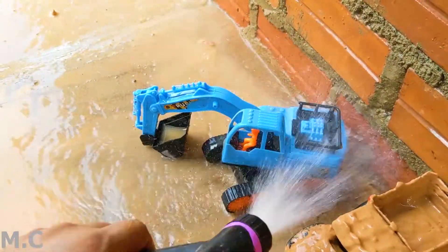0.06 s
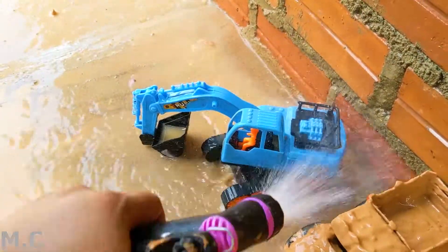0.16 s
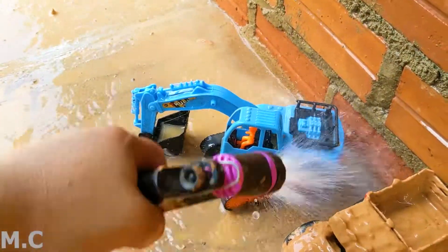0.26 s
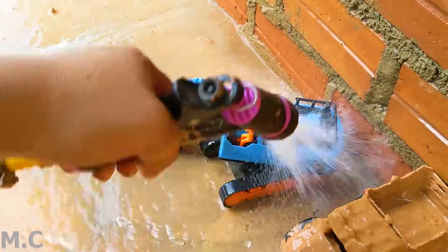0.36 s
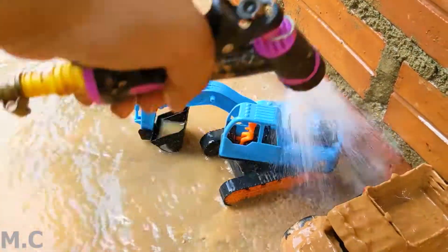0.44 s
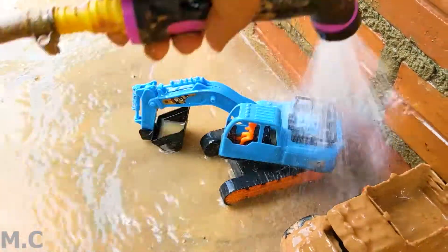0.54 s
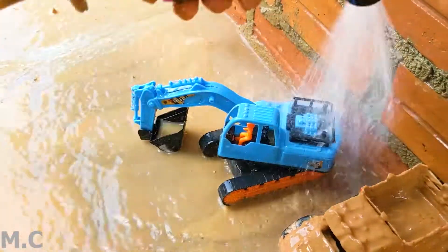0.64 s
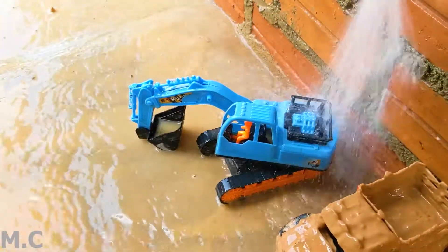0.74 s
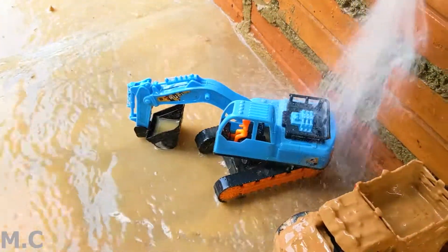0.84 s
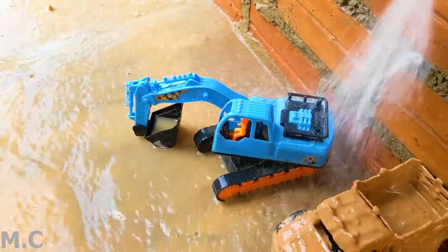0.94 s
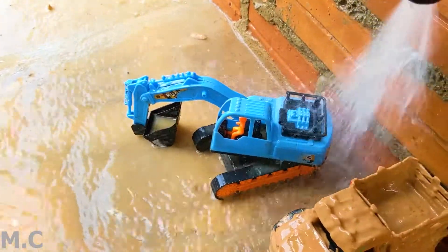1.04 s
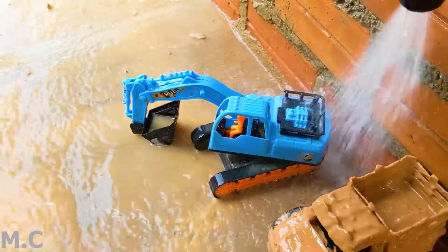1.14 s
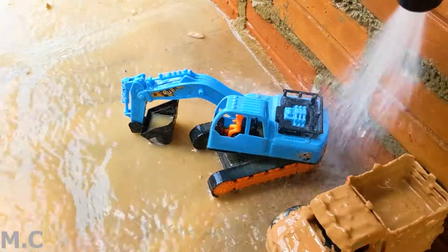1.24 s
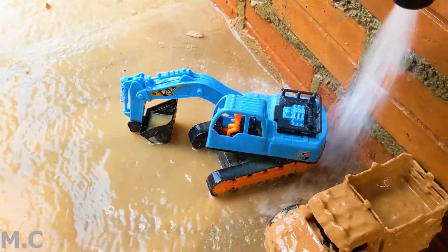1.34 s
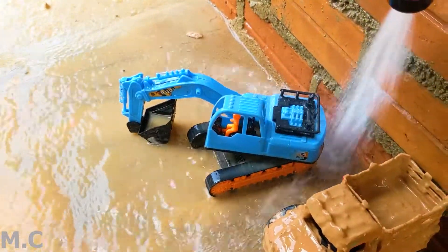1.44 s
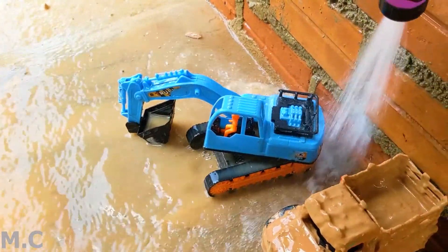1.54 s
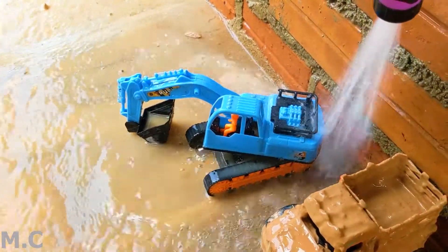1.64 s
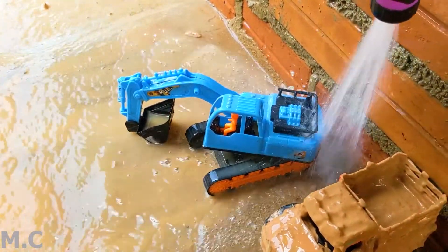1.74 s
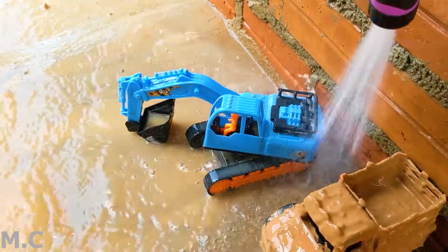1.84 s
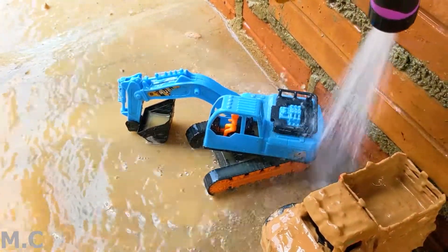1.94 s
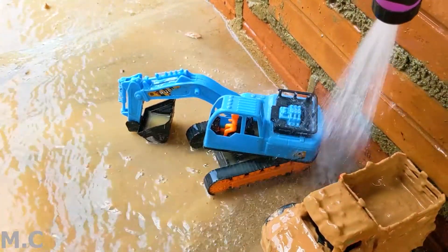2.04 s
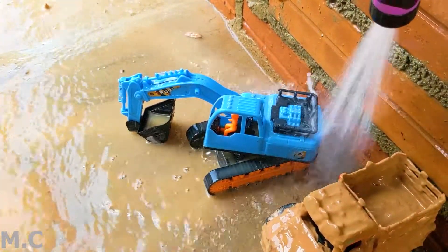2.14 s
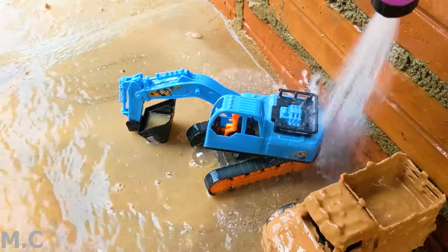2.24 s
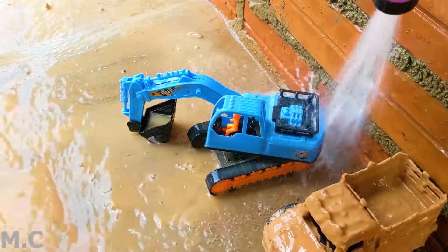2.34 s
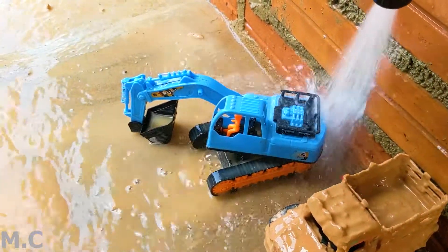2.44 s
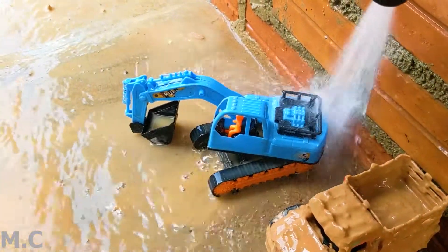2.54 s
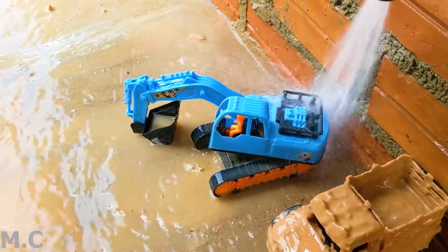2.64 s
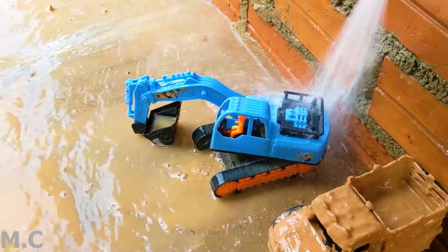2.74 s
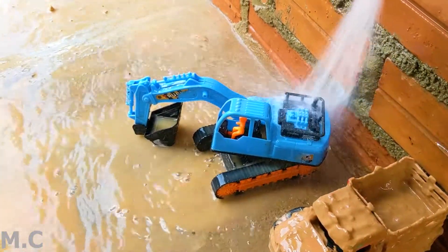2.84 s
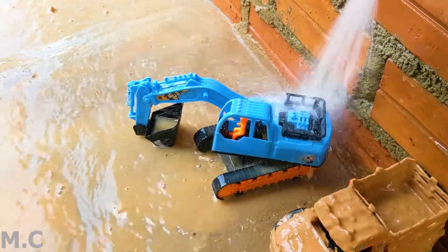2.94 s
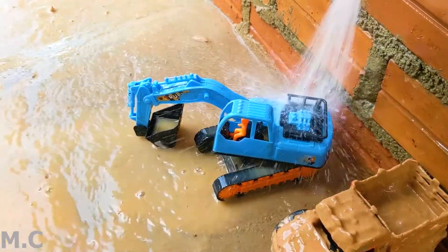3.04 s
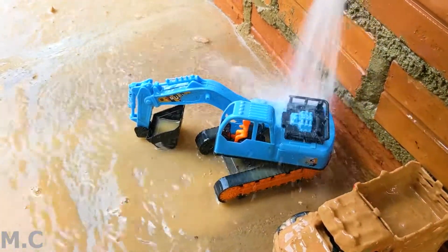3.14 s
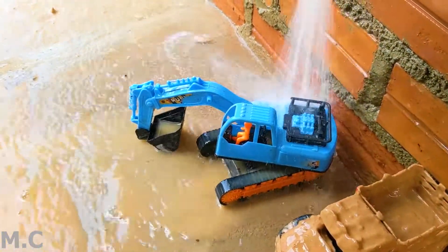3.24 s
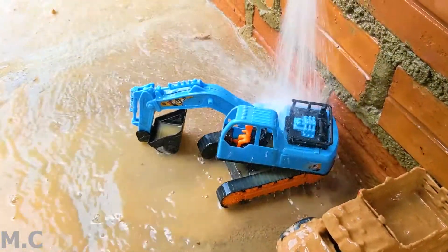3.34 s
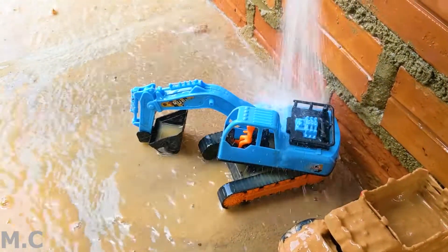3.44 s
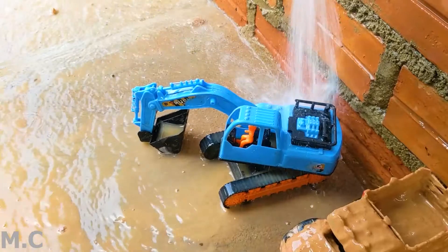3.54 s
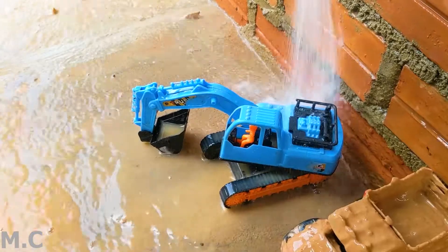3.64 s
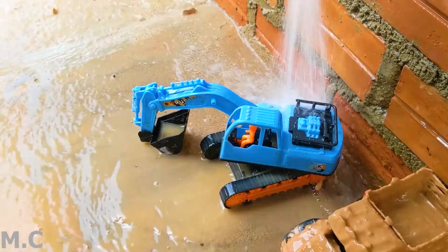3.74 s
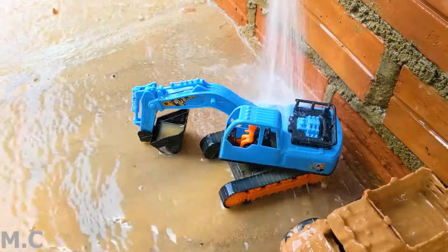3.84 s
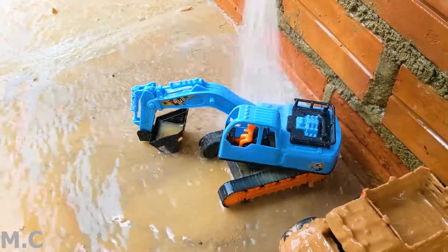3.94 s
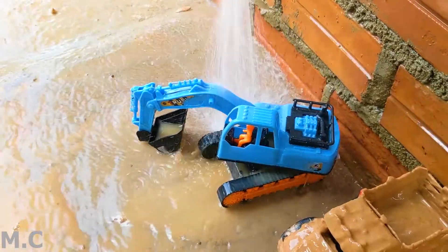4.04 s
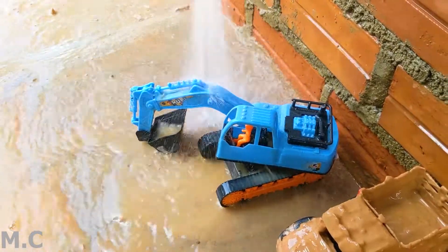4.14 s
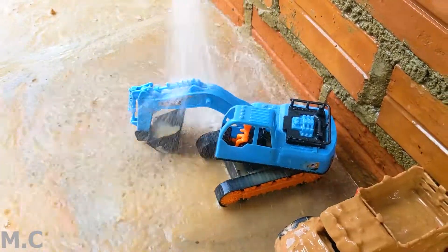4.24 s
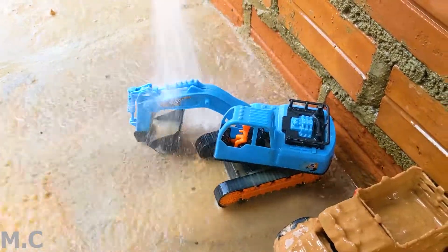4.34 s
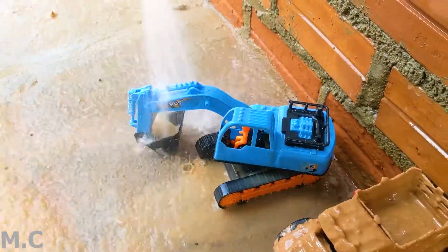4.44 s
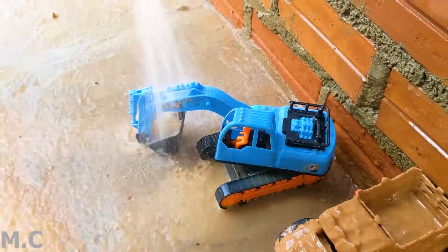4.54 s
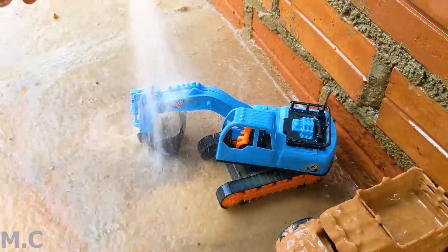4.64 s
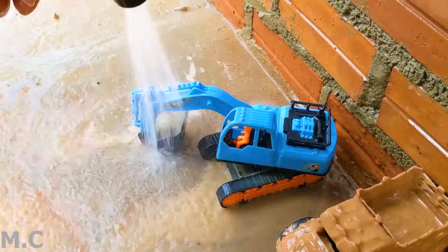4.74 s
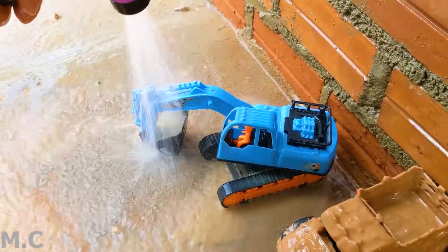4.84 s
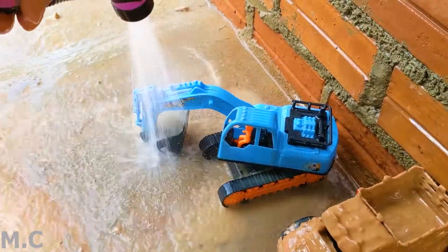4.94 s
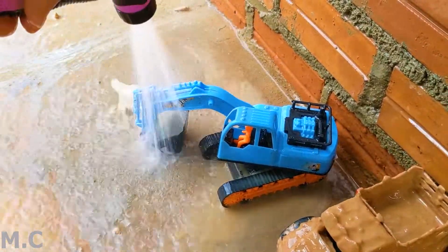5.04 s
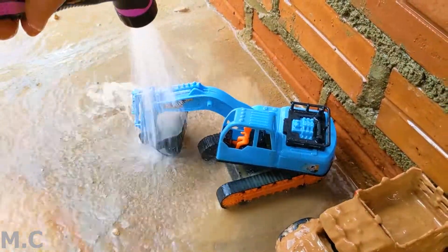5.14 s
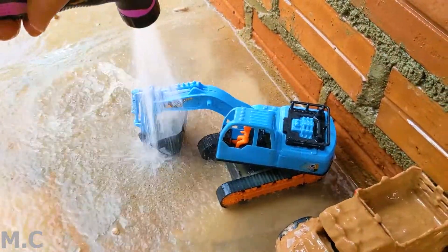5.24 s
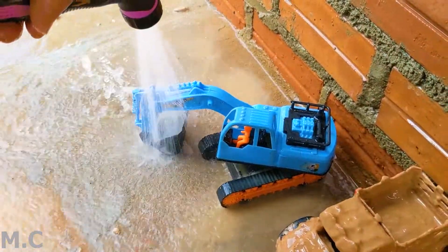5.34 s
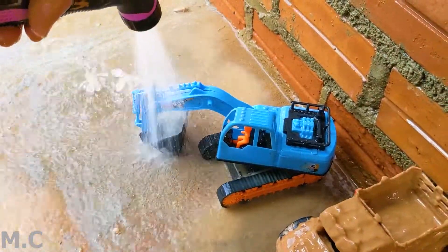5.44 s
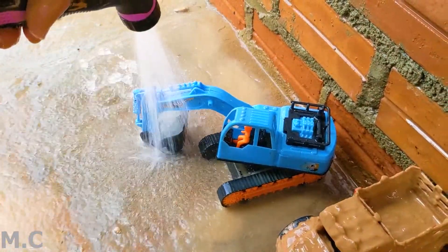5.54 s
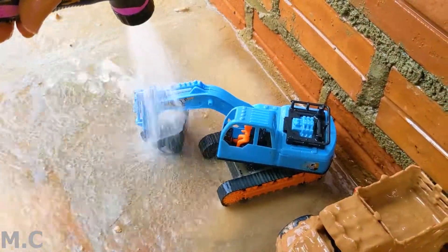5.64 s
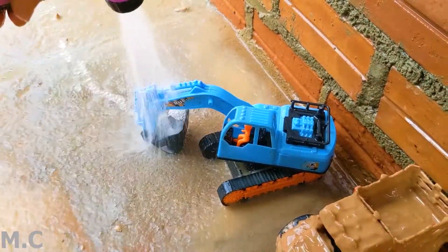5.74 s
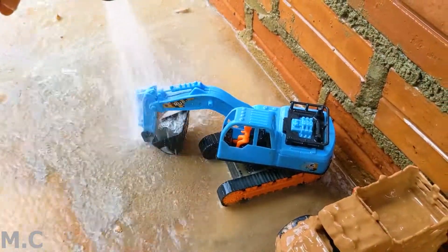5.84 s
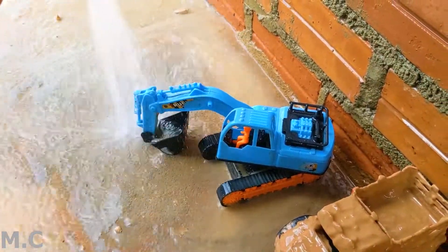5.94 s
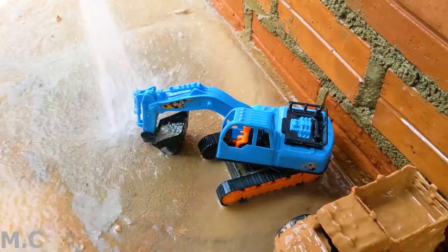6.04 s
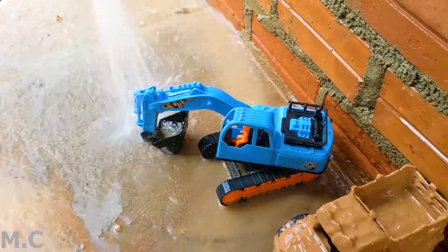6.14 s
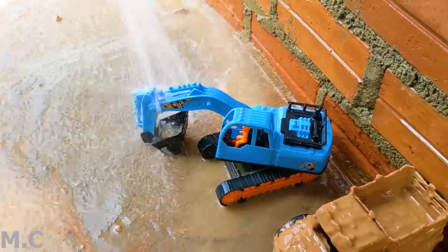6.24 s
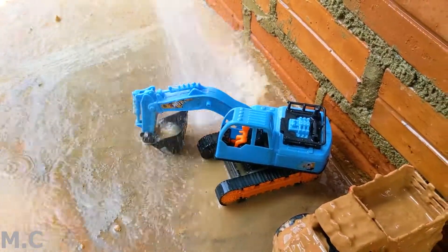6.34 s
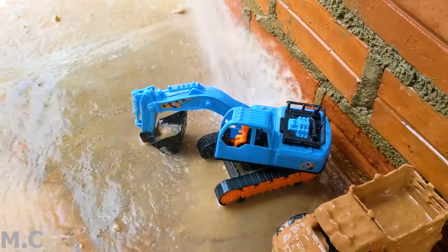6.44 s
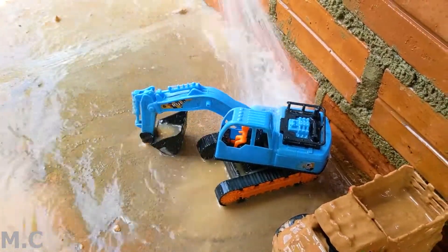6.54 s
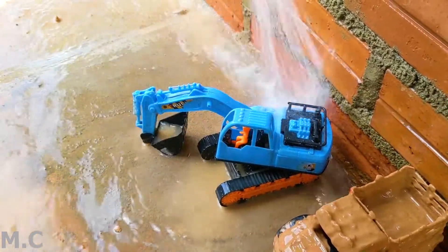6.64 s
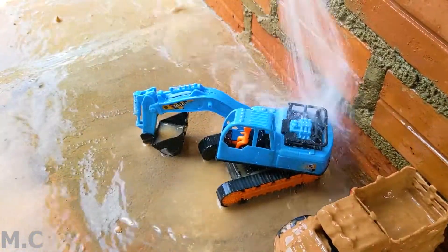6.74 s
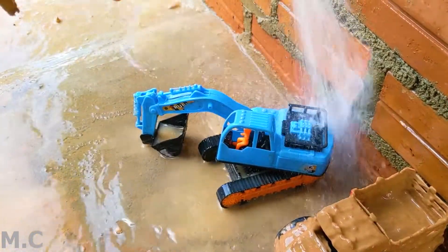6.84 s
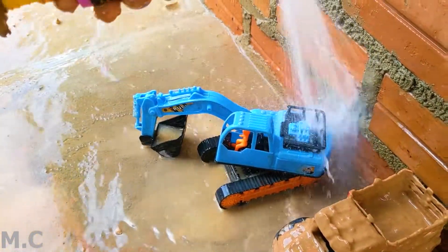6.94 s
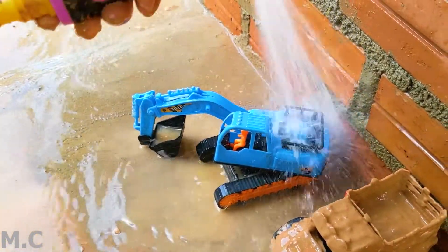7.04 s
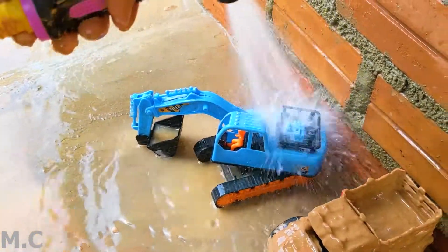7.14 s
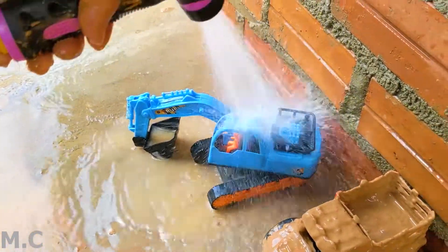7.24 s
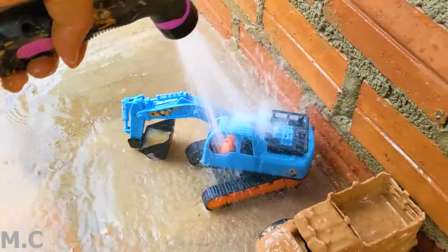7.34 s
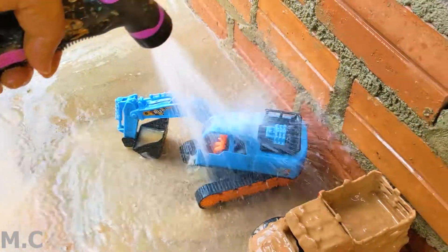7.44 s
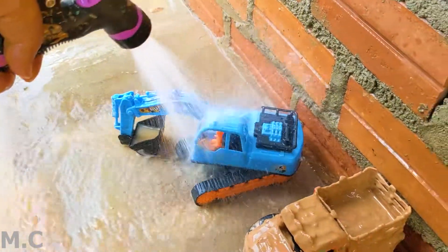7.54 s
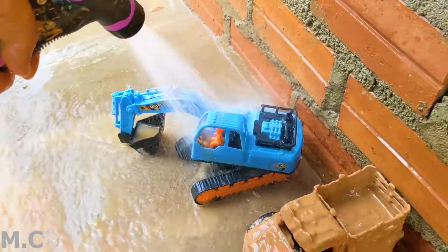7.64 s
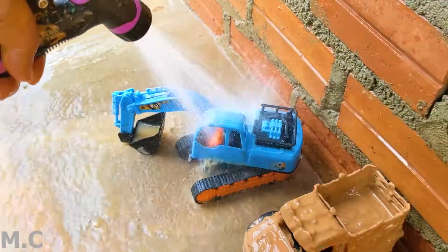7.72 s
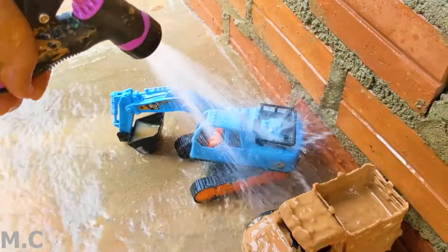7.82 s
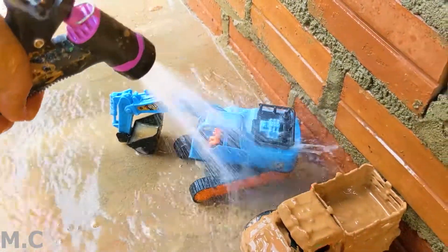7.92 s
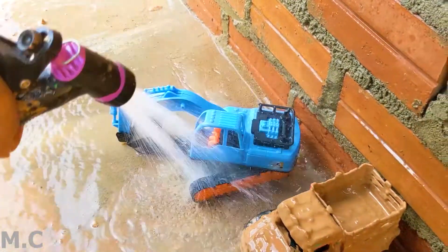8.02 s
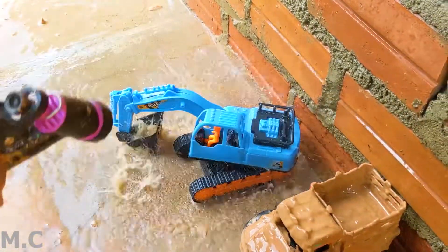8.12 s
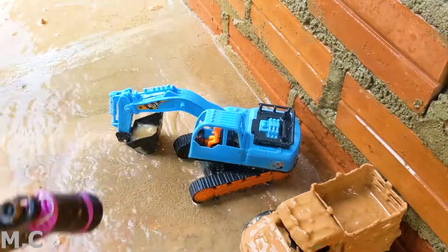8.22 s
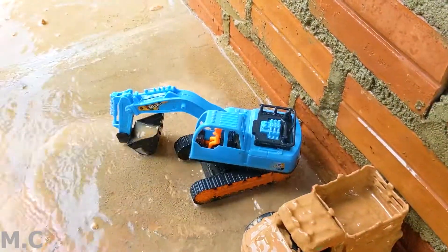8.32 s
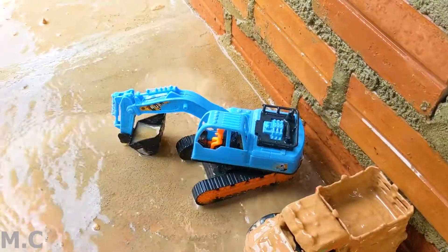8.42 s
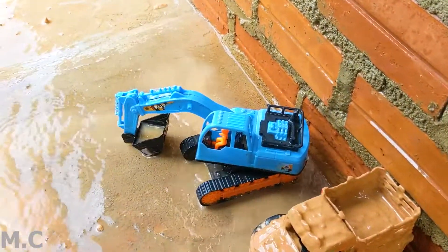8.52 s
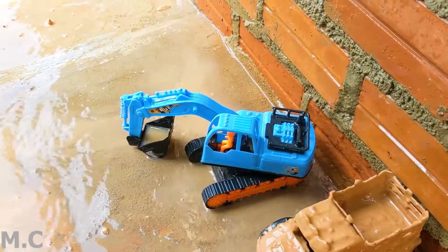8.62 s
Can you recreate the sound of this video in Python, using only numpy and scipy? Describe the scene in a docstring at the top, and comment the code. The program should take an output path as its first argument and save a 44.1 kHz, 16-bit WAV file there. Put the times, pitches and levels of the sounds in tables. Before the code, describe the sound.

A hose jet hisses and splashes over wet concrete and drums hollowly on a plastic toy digger, then shuts off with a clack and drips.

```python
"""A hissing, splashing spray and hollow drumming: a garden hose plays on a plastic toy digger and wet concrete.
Water is random drop impacts, filtered to a colour each for mist, sizzle, splash, churn and spatter.
The toy's shell resonates under the drops, its cavities gush, and its bucket rings louder as it fills.
The jet shuts off, the nozzle clacks and spits, and the run-off drips and bubbles near a brick wall.
A faint trickle, a low background, a wavering hum and a rumble lie underneath."""
import sys
import numpy as np
from scipy import signal
from scipy.fft import rfft, irfft, next_fast_len
from scipy.io import wavfile
from scipy.ndimage import uniform_filter1d

SR = 44100
rng = np.random.default_rng(int(sys.argv[2]) if len(sys.argv) > 2 else 0)


def wrap_up_sound(samples):
    """Save the sound to the file named by the first command line argument, as 16-bit audio."""
    columns = np.atleast_2d(samples).T
    # keep every value between -1 and 1, then stretch to whole-number steps
    tamed = np.clip(columns, -1, 1)
    steps = np.round(tamed * 32767).astype(np.int16)
    wavfile.write(sys.argv[1], SR, steps)


N = 382788
SIZE = next_fast_len(N + SR // 4)  # room for filters to ring out
T, HZ = np.arange(N) / SR, np.fft.rfftfreq(SIZE, 1 / SR)

# low outdoor background: (frequency [Hz], spectral level [dB per Hz])
YARD_COLOUR = [(20, -26), (40, -24), (65, -3.5), (85, -9), (140, -1), (185, 1), (240, -10.5), (350, -17.5),
               (700, -25), (2000, -33), (16000, -61)]
# wavering hum: (time [s], level [dB])
HUM_LEVEL = [(0, -64), (.6, -59), (.9, -54), (2.7, -57), (3.5, -41.5), (3.9, -50.5), (5.8, -53), (7.7, -60)]
# low rumble as the jet crosses the toy: (time [s], level [dB])
RUMBLE_LEVEL = [(0, -56), (2.76, -51), (2.87, -33), (3.02, -47), (3.7, -47.5), (4.3, -52.5), (8.68, -69)]
# the nozzle's clack and the last drops: (time [s], level [dB], decay by 60 dB [s])
CLACK_HITS = [(8.259, -28.5, 0.045), (8.27, -38, 0.06), (8.391, -42.5, .02), (8.463, -50, 0.035)]
# colour of a clack: (frequency [Hz], level [dB])
CLACK_COLOUR = [(150, -22), (500, 4), (1300, 1), (2800, 4), (4500, -10), (7000, -29), (15000, -26)]
# bubbles in the run-off: (time [s], starting pitch [Hz], level [dB], decay by 60 dB [s])
BUBBLE_PINGS = [(8.212, 3580, -41.5, 0.037), (8.466, 600, -43, 0.035), (8.594, 2600, -53, .05),
                (8.648, 1350, -51, .05)]
# the puddle drains with a last squelch:
# (time [s], half length [s], frequency [Hz], width [Hz], level [dB], left minus right [dB])
DRAIN_SQUELCH = [(8.663, 0.032, 3720, 504, -55, -2)]
# last spits of the nozzle: (time [s], level [dB])
NOZZLE_SPITS = [(8.259, -46), (8.392, -50), (8.482, -57)]
# the bucket's resonances: (frequency [Hz], width [Hz], left level [dB], right level [dB])
BUCKET_MODES = [(1210, 78, -13, -8.5), (1770, 230, -4.5, -9), (2320, 230, -1.5, -4.5),
                (2583, 240, -20, 4.5), (3620, 150, -5, 3.5)]
# hollow gushes where the jet catches a cavity of the toy:
# (time [s], half length [s], frequency [Hz], width [Hz], level [dB], left minus right [dB])
CAVITY_GUSHES = [(.06, 0.11, 1540, 220, -31, 5), (1.48, 0.18, 3500, 200, -33.5, -17),
                 (1.85, 0.42, 1020, 220, -39, -7), (2.7, 0.13, 2600, 340, -29, -8),
                 (3.35, 0.5, 3350, 140, -38, -14), (3.805, 0.085, 1080, 180, -27.5, -4),
                 (3.808, 0.046, 1466, 330, -24, 0), (3.822, .035, 1800, 297.7, -23.5, -3),
                 (4.06, 0.037, 2116, 200, -31.5, -8), (4.16, .11, 2950, 520, -32, -8),
                 (4.68, 0.1, 2300, 380, -31.5, 1), (5.3, .2, 2550, 230, -29.5, -6),
                 (5.85, 0.049, 3540, 301.5, -23, -16), (6.33, 0.043, 3540, 297, -33, -10),
                 (6.705, .028, 1400, 1000, -26.5, -6), (7.53, .22, 2700, 1099, -33, 4),
                 (8.0, 0.077, 1950, 900, -27.5, -3), (8.03, 0.067, 1265, 500, -24.5, -9.5),
                 (8.11, 0.081, 4000, 750, -28.5, -10)]
# the jet breaks up on thin plastic edges: (lands [s], leaves [s], level [dB])
EDGE_SPATTERS = [(3.86, 4.017, -36), (4.327, 4.746, -35.5), (4.898, 5.9, -37.5), (6.52, 6.667, -31.5),
                 (7.313, 7.76, -34), (7.8, 7.876, -29.5)]
# colour of the spatter: (frequency [Hz], left level [dB], right level [dB])
SPATTER_COLOUR = [(2000, -15, -22), (3880, -2, 2), (5450, 5, 0), (5960, -1, -19), (8960, -31, -39)]
# resonance of the toy's hollow shell at rest: (frequency [Hz], level [dB])
SHELL_COLOUR = [(150, -47), (300, -31.5), (420, -34.5), (520, -12.5), (600, -5.5), (655, 1.5), (690, 3),
                (740, -2), (800, -7.5), (900, -24), (1080, -27.5), (1600, -26)]
# water covers and uncovers the shell's openings, moving its resonance: (time [s], frequency [Hz])
SHELL_PITCH = [(0, 704.7), (1.5, 688), (2.05, 712.4), (3.05, 686.6), (3.43, 666), (5.9, 684), (6.9, 704),
               (7.4, 675), (8.0, 738)]
# heavy slugs of water on the shell: (time [s], peak level [dB])
SHELL_SLAPS = [(1.715, -13), (1.769, -15), (2.007, -10), (2.029, -14.5), (2.736, -12), (2.985, -11.5),
               (7.170, -7), (7.273, -13), (7.851, -10), (7.867, -9), (8.107, -15), (8.171, -22)]
# passes of the jet over the shell: (lands [s], hits squarely [s], leaves [s],
# level when square [dB], change in level at either end [dB])
SHELL_PASSES = [(0.01, 0.737, 0.95, -25, -6), (1.026, 1.204, 1.41, -30.5, -8.5),
                (1.652, 1.741, 1.805, -25.5, 3), (1.878, 2.015, 2.28, -25.5, -3),
                (2.24, 2.524, 2.68, -28, -5.5), (2.61, 3.036, 3.33, -17, -11),
                (3.143, 3.3, 3.585, -28.5, 1), (3.797, 3.844, 4.05, -27, -7.5),
                (6.713, 7.25, 7.45, -19, -7), (7.467, 7.6, 7.8, -29, -1), (7.8, 7.86, 8.02, -20.5, -7.5),
                (8.02, 8.084, 8.1, -24, -4)]
# the jet on the ground: (time [s], churning level [dB], splash level [dB])
GROUND_LEVEL = [(0, -27.5, -30), (.6, -35, -31.5), (1.4, -32.5, -29), (2.2, -34, -28.5), (3.0, -31, -32.5),
                (3.92, -29, -28.5), (4.15, -37, -32.5), (4.6, -34, -26.5), (5.86, -36.5, -28),
                (5.98, -41, -32.5), (6.21, -42.5, -33), (6.64, -31.5, -27), (6.8, -31.5, -31.5),
                (7.15, -29.5, -29.5), (7.5, -28, -27.5), (7.7, -30.5, -30), (8.16, -29.5, -29)]
# the jet's place: (time [s], mean delay at the right microphone [ms])
JET_DELAY = [(2.8, 0.053), (4.2, 0.15), (6.2, .22), (6.7, 0.065), (7.3, 0.15)]
# the spray thrown off: (time [s], fine mist level [dB], coarser sizzle level [dB])
SPRAY_LEVEL = [(0.03, -28.5, -30.5), (.7, -27, -31), (1.5, -26.5, -28.5), (1.95, -25.5, -29),
               (4.28, -26.5, -29.5), (4.69, -27.5, -28.5), (4.82, -27, -35.5), (5.17, -24.7, -30.5),
               (5.8, -27.5, -32), (6.0, -25, -32), (6.77, -28.5, -29.5), (6.88, -24.5, -29.5),
               (7.68, -29, -32), (7.86, -26, -30)]
# colours of the impacts, fine to heavy: (frequency [Hz], left level [dB], right level [dB])
MIST_COLOUR = [(6000, -23, -23), (9000, -10.5, -22), (10330, -5, -14), (10870, 2, -17.5),
               (12740, -2, -12.5), (13200, -3, -18), (14100, -7.5, -15), (15000, -3, -12), (16000, -6, -21)]
SIZZLE_COLOUR = [(2470, -2.5, -26), (4530, -1.5, -7.5), (5400, -0.5, -12.5), (6500, -1, -11.5),
                 (8750, 2.5, -12), (9970, 1, -15), (12900, -16.5, -34)]
SPLASH_COLOUR = [(1000, -52, -51), (2150, -38, -8), (3020, -11.5, 0.5), (3620, -16, 1), (4220, -11.5, -4.5),
                 (4620, -14.5, -11), (5300, -8, -16.5), (6540, -30, -29)]
CHURN_COLOUR = [(100, -17, -27), (300, -12.5, -10), (850, -6, -5.5), (947, -16, -3), (1160, -7, 2),
                (1580, -1, 2), (1850, 1, 2.5), (1970, -11.5, 1), (2240, -1.5, 3), (3070, -3, -2.5),
                (4640, -14, -21), (8000, -47, -32)]
# resonances of the two microphone ports: (frequency [Hz], width [Hz], level [dB])
LEFT_PORT_MODES = [(4460, 180, 6.5), (6150, 190, 6), (6830, 180, 6.5), (11940, 88, 9.5), (12650, 130, 4.5),
                   (14800, 150, 5), (15300, 200, 3)]
RIGHT_PORT_MODES = [(3240, 114, -3.5), (3390, 190, 2.5), (6270, 1300, 4.5), (12450, 250, 5)]

SHUT_S = 8.178  # the jet stops
BUCKET_IN_S, BUCKET_OUT_S = 4.26, 5.89  # the jet stays in the bucket
BUCKET_DB, FILL_DB_PER_S = -33, 5.5  # level as the jet enters, and its rise as the bucket fills
ARM_DB, ARM_DB_PER_S = -37, -2.5  # drumming that the arm carries to the shell; the filling bucket damps it
STRAY_DB = -8.3  # water thrown from the puddle onto the shell, against the churning
SWEEP_S = 0.022  # time constant of the jet's edge crossing onto or off a surface
DRIPS_DB, DRIPS_DB_PER_S = -59, -30  # water dripping off the toy after the jet stops
SPIT_T60 = 0.02  # decay of a spit by 60 dB [s]
GUSH_SAG = .38  # sinking of a gush in one half length, as a share of its width (taken as 500 Hz at most)
SHELL_REST_HZ = 690
EDGE_HZ = 15800  # upper band limit


def amp(db):
    """Level in decibels as an amplitude ratio."""
    return 10 ** (np.asarray(db) / 20)


def unit(x):
    """Normalises a sound so that the mean of its channels has rms 1."""
    return x / np.sqrt(np.mean(np.atleast_2d(x).mean(0) ** 2) + 1e-20)


def curve(rows, axis=1):
    """Linear interpolation of one column of a time table at every sample."""
    rows = np.array(rows)
    return np.interp(T, rows[:, 0], rows[:, axis])


def spectrum(rows):
    """Gain against log frequency, one row per dB column, rolled off beyond both ends of the table."""
    f, *columns = np.transpose(rows)
    below = np.minimum(HZ / f[0], 1)
    above = np.minimum(f[-1] / (HZ + 1), 1) ** 2
    return below * above * amp([np.interp(np.log(HZ + 1), np.log(f), c) for c in columns])


def bell(hz, width):
    """Resonance curve: 1 at its centre and one half at half a width to either side."""
    return 1 / (1 + (2 * (HZ - hz) / width) ** 2)


def colour(x, gain):
    """Linear filtering: the spectrum of a sound times a gain per frequency."""
    return irfft(rfft(x, SIZE) * gain, SIZE)[..., :N]


def wander(rate_hz):
    """Slow random fluctuation of rms 1, up to about the given rate."""
    count = int(2 * rate_hz * T[-1]) + 2
    steps = rng.standard_normal(count)
    return unit(np.interp(T * 2 * rate_hz, np.arange(count), steps))


def drops(per_s, spread_db, patch_ms):
    """Random impacts over a patch: scattered delays at the right keep bass alike and make treble differ."""
    chance, size, place, sign = rng.random((4, N))
    at = np.flatnonzero(chance < per_s / SR)
    size_db = spread_db * np.minimum(-np.log(1 - size[at]), 3.5)
    hit = np.sign(sign[at] - .5) * amp(size_db)
    offset = 2 * place[at] - 1
    scatter_ms = -patch_ms * np.sign(offset) * np.log(1 - abs(offset) + 1e-9)
    delay_ms = curve(JET_DELAY)[at] + scatter_ms
    later = np.clip(at + np.round(delay_ms * SR / 1000).astype(int), 0, N - 1)
    return np.array([np.bincount(at, hit, N), np.bincount(later, hit, N)])


def add(mix, s, sound):
    """Superposes a sound on the mix, in place, from time s."""
    part = mix[..., round(s * SR):][..., :sound.shape[-1]]
    part += sound[..., :part.shape[-1]]


def bend(x, shift_hz):
    """Single-sideband shift: the analytic signal, turned in phase, moves every resonance by the same Hz."""
    length = len(shift_hz)
    analytic = signal.hilbert(x, next_fast_len(length))[..., :length]
    return (analytic * np.exp(2j * np.pi * np.cumsum(shift_hz) / SR)).real


def contact(lands, leaves):
    """Share of the jet on a surface, 0-1, as its edge sweeps on and off again."""
    on = (1 + np.tanh((T - lands) / SWEEP_S)) / 2
    off = (1 - np.tanh((T - leaves) / SWEEP_S)) / 2
    return on * off


def gushes(rows, rough_db=1.5):
    """Ragged drop noise excites a hollow's resonance, which sinks in pitch as the water moves on."""
    out = np.zeros((2, N))
    patter = drops(per_s=3000, spread_db=-0.5, patch_ms=.06) * amp(rough_db * wander(rate_hz=35))
    for s, half, hz, width, db, pan_db in rows:
        near = abs(T - s) < 3 * half
        along = (T[near] - s) / half
        b, a = signal.iirpeak(hz, hz / width, SR)
        once = signal.lfilter(b, a, patter[:, near])
        ring = signal.lfilter(b, a, once)
        ring = bend(ring, -GUSH_SAG * min(width, 500) * along)
        out[:, near] += unit(ring * amp([[pan_db], [0]])) * amp(db) * np.exp(-along ** 2)
    return out


def walls(x, t60=0.19, dull_hz=6000):
    """Reverberation: a decaying tail of sparse echoes from the brickwork, duller than the direct sound."""
    t = T[:SR // 2]
    sparse = (rng.random((2, len(t))) < .1) * (t > .004)
    taps = rng.standard_normal((2, len(t))) * sparse * amp(-60 * t / t60)
    tail = signal.fftconvolve(x, taps / np.linalg.norm(taps[0]), axes=1)[:, :N]
    return colour(tail, 1 / np.sqrt(1 + (HZ / dull_hz) ** 2))


def floor():
    """Partly correlated noise: a common part and weaker independent parts make a wide background."""
    common, left, right = rng.standard_normal((3, N))
    return amp(-49) * unit(colour(common + 0.36 * np.array([left, right]), spectrum(YARD_COLOUR)))


def hum():
    """Frequency modulation: a low sine whose pitch wavers slightly."""
    phase = 2 * np.pi * np.cumsum(70.5 + 1.21 * wander(rate_hz=6.6)) / SR
    return amp(curve(HUM_LEVEL)) * np.sqrt(2) * np.sin(phase)


def rumble():
    """Noise through two broad low resonances."""
    noise = rng.standard_normal(N)
    return amp(curve(RUMBLE_LEVEL)) * unit(colour(noise, bell(83, 45) + 1.4 * bell(175, 90)))


def yard():
    """Superposition of the background, the hum and the rumble; the last two lean to the left."""
    return floor() + (hum() + rumble()) * amp([[1.3], [-1.3]])


def clacks():
    """Short impacts: coloured noise with a fast onset and exponential decay."""
    out, t = np.zeros((2, N)), T[:SR // 5]
    grit = unit(colour(drops(per_s=15000, spread_db=1.0, patch_ms=0.093), spectrum(CLACK_COLOUR)))
    for s, db, t60 in CLACK_HITS:
        burst = grit[:, round(s * SR):][:, :len(t)]
        add(out, s, burst * amp(db - 60 * t / t60) * np.minimum(t / 0.0015, 1))
    return out


def bubbles():
    """Bubble oscillation: decaying sines that rise slightly in pitch."""
    out, t = np.zeros((2, N)), T[:SR // 5]
    for s, hz, db, t60 in BUBBLE_PINGS:
        ping = np.sin(2 * np.pi * hz * t * (1 + 0.44 * t)) * np.minimum(t / 0.0018, 1)
        add(out, s, amp(db - 60 * t / t60) * ping)
    return out


def dripping():
    """Sparse impacts that die away exponentially once the jet has stopped."""
    level = amp(DRIPS_DB + DRIPS_DB_PER_S * np.maximum(T - SHUT_S, 0)) * (T > SHUT_S)
    gain = amp(-6) * spectrum(SIZZLE_COLOUR) + spectrum(CHURN_COLOUR)
    return level * unit(colour(drops(per_s=80, spread_db=3.0, patch_ms=.1), gain))


def trickle():
    """Sparse impacts at a steady, very low level throughout."""
    return amp(-72) * unit(colour(drops(per_s=120, spread_db=1.5, patch_ms=0.16), spectrum(SPLASH_COLOUR)))


def run_off():
    """Direct and reflected sound of clacks, bubbles and drips, with the dry trickle and squelch."""
    out = clacks() + bubbles() + dripping()
    return out + amp(-1.5) * walls(out, dull_hz=2400) + trickle() + gushes(DRAIN_SQUELCH)


def spits():
    """Exponential bursts of drop noise: the closed nozzle lets go a few tiny puffs of mist."""
    puffs = np.zeros(N)
    for s, db in NOZZLE_SPITS:
        add(puffs, s, amp(db - 60 * T[:SR // 5] / SPIT_T60))
    return puffs * unit(colour(drops(per_s=9000, spread_db=6.5, patch_ms=.05), spectrum(MIST_COLOUR)))


def bucket():
    """Forced resonance: drops ring the bucket, and sloshing water sways its pitch and level together."""
    power = sum(amp([[l], [r]]) ** 2 * bell(hz, width) ** 2 for hz, width, l, r in BUCKET_MODES)
    filling = amp(BUCKET_DB + FILL_DB_PER_S * (T - BUCKET_IN_S)) * contact(BUCKET_IN_S, BUCKET_OUT_S)
    ring = unit(colour(drops(per_s=3000, spread_db=4.0, patch_ms=0.062), np.sqrt(power))) * filling
    slosh = wander(rate_hz=9)
    return bend(ring * amp(0.55 * slosh), 36 * slosh)


def cavities():
    """Cavity resonance: the bucket rings and other hollows gush as the jet passes them."""
    return bucket() + gushes(CAVITY_GUSHES)


def spatter():
    """Jet break-up: fewer drops crackle in uneven bursts where the jet splits on an edge."""
    strength = sum(amp(db) * contact(lands, leaves) for lands, leaves, db in EDGE_SPATTERS)
    crackle = unit(colour(drops(per_s=2200, spread_db=2.5, patch_ms=0.042), spectrum(SPATTER_COLOUR)))
    return crackle * strength * amp(2.8 * wander(rate_hz=35))


def drumming():
    """Incoherent addition: direct passes, stray water and the shaking bucket sum in power."""
    arm = amp(ARM_DB + ARM_DB_PER_S * (T - BUCKET_IN_S)) * contact(BUCKET_IN_S, BUCKET_OUT_S)
    power = amp(curve(GROUND_LEVEL, axis=1) + STRAY_DB) ** 2 + arm ** 2
    for lands, square, leaves, db, glancing_db in SHELL_PASSES:
        off_centre = np.interp(T, [lands, square, leaves], [1, 0, 1])
        power = power + amp(db + glancing_db * off_centre) ** 2 * contact(lands, leaves)
    return np.sqrt(power)


def slaps():
    """Impulse response: each slug of water swells and decays as a sine at the shell's resonance."""
    out, t = np.zeros(N), T[:SR // 20]
    swell = t / 0.0026  # peaks at 2.6 ms
    for s, db in SHELL_SLAPS:
        tone = np.sin(2 * np.pi * (SHELL_REST_HZ * t + rng.random()))
        add(out, s, amp(db) * swell * np.exp(1 - swell) * tone)
    return out


def shell():
    """Forced resonance: drops and slaps excite the hollow shell, whose pitch shifts as it is covered."""
    patter = drops(per_s=1800, spread_db=1.5, patch_ms=0)[0]
    drum = unit(colour(patter, spectrum(SHELL_COLOUR))) * drumming() * amp(1.0 * wander(rate_hz=16))
    shift_hz = curve(SHELL_PITCH) - SHELL_REST_HZ + 9 * wander(rate_hz=9)
    return bend(drum + slaps(), shift_hz) * amp([[-.4], [.4]])


def drift(x, patchy_db=1.77):
    """Time-varying filtering: as the jet sweeps over uneven ground, faint resonances come and go."""
    z = signal.stft(x, nperseg=1024)[2]
    patches = rng.standard_normal(z.shape[1:])
    for _ in range(2):
        patches = uniform_filter1d(patches, size=6, axis=0)  # across frequency
        patches = uniform_filter1d(patches, size=14, axis=1)  # across time
    return signal.istft(z * amp(patchy_db * patches / patches.std()), nperseg=1024)[1][:, :N]


def mist(flutter):
    """Dense impacts of the finest drops give a high hiss."""
    hiss = unit(colour(drops(per_s=12000, spread_db=4.0, patch_ms=.04), spectrum(MIST_COLOUR)))
    return hiss * amp(curve(SPRAY_LEVEL, axis=1) + 0.56 * flutter)


def sizzle(flutter):
    """Dense impacts of coarser spray give a lower, wider hiss."""
    hiss = unit(colour(drops(per_s=10000, spread_db=2.0, patch_ms=.05), spectrum(SIZZLE_COLOUR)))
    return hiss * amp(curve(SPRAY_LEVEL, axis=2) + 0.66 * flutter)


def splash(flutter):
    """Impacts on concrete, coloured in the middle treble, with a slow unevenness of their own."""
    impacts = unit(colour(drops(per_s=7000, spread_db=2.5, patch_ms=.045), spectrum(SPLASH_COLOUR)))
    return impacts * amp(curve(GROUND_LEVEL, axis=2) + 0.84 * flutter + 0.79 * wander(rate_hz=8))


def churn(flutter):
    """Impacts in the puddle, coloured lower, with an unevenness of their own."""
    impacts = unit(colour(drops(per_s=4500, spread_db=2.5, patch_ms=.06), spectrum(CHURN_COLOUR)))
    return impacts * amp(curve(GROUND_LEVEL, axis=1) + 0.51 * flutter + 1.05 * wander(rate_hz=15))


def water():
    """Common modulation: mist, sizzle, splash and churn share the flutter of the breaking jet."""
    flutter = wander(rate_hz=25)
    return drift(mist(flutter) + sizzle(flutter) + splash(flutter) + churn(flutter))


def scene():
    """Excitation and decay: the jet runs until the valve shuts; the water still in the air then settles."""
    since = np.maximum(T - SHUT_S, 0)
    valve = amp(-60 * since / 0.043)
    settling = np.maximum(valve, amp(-29.5 - 44 * since))
    near = (water() + spatter() + cavities()) * settling + shell() * valve
    return near + amp(-14.0) * walls(near) + run_off() + spits() + yard()


def record(dry):
    """Port resonance: the microphone ports colour the treble; a low-pass then limits the band."""
    ports = (LEFT_PORT_MODES, RIGHT_PORT_MODES)
    ports_db = np.array([sum(db * bell(hz, width) for hz, width, db in port) for port in ports])
    heard = colour(dry, amp(ports_db))
    low_pass = signal.firwin(511, EDGE_HZ, window=("kaiser", 9), fs=SR)
    return signal.oaconvolve(heard, low_pass[None], "same")


dry = scene()
out = record(dry)
wrap_up_sound(out)
```